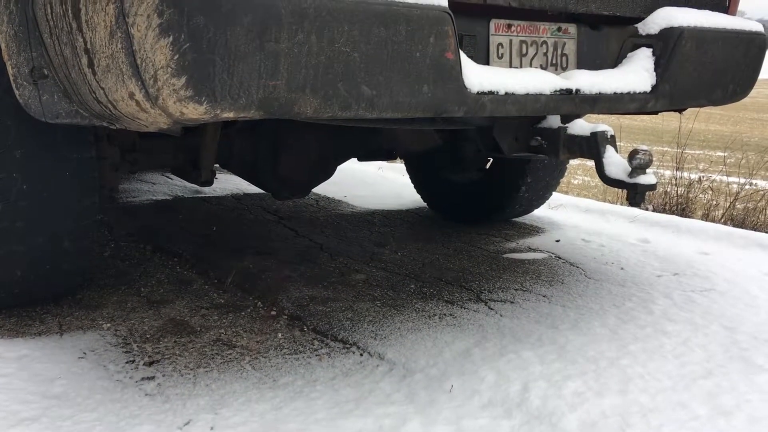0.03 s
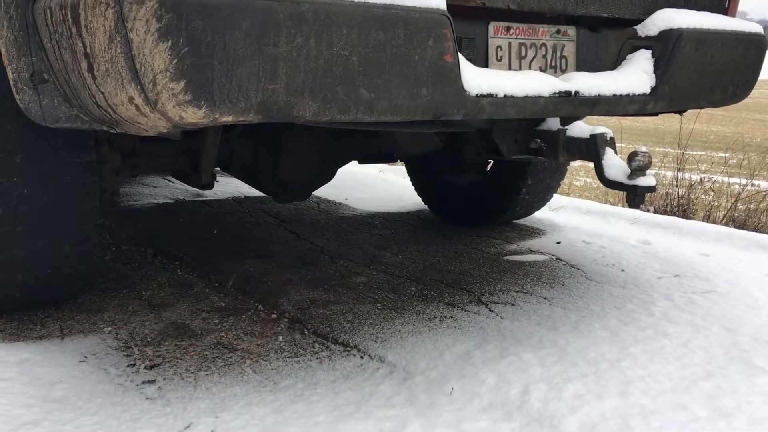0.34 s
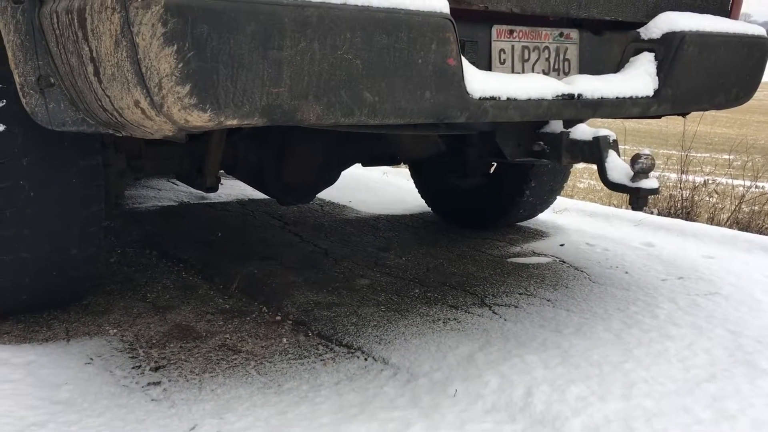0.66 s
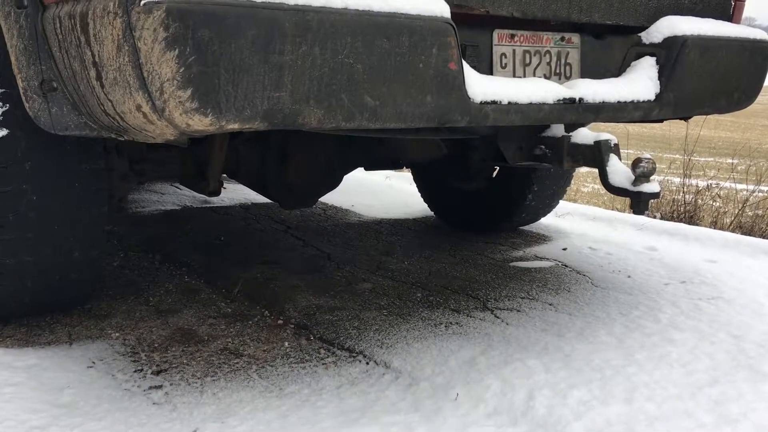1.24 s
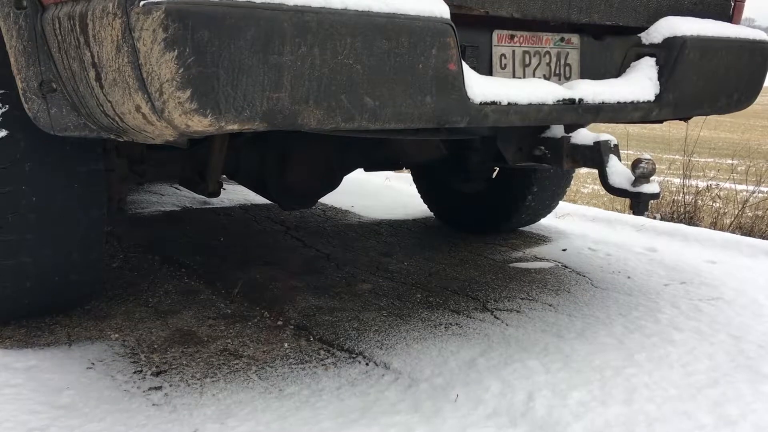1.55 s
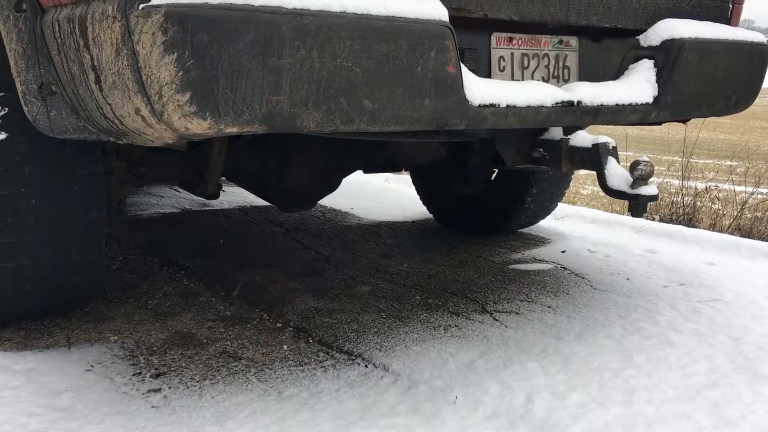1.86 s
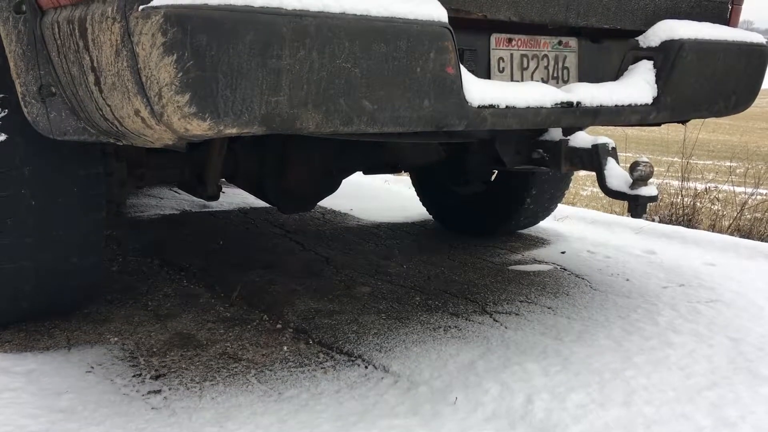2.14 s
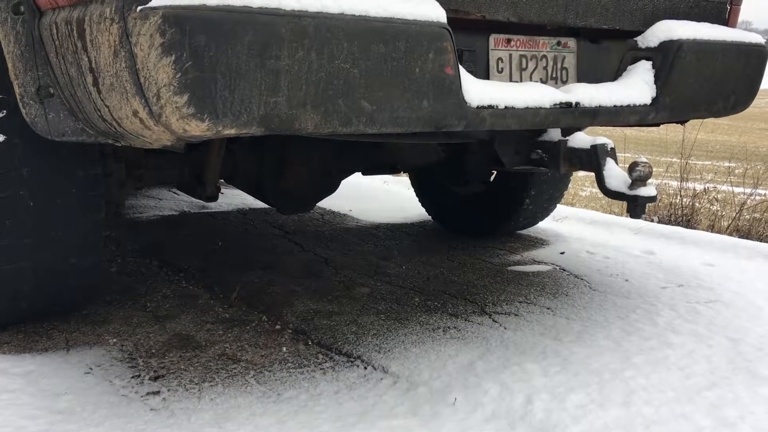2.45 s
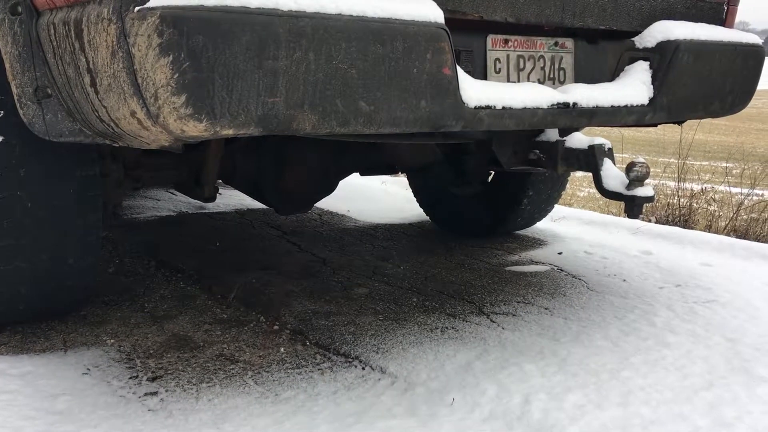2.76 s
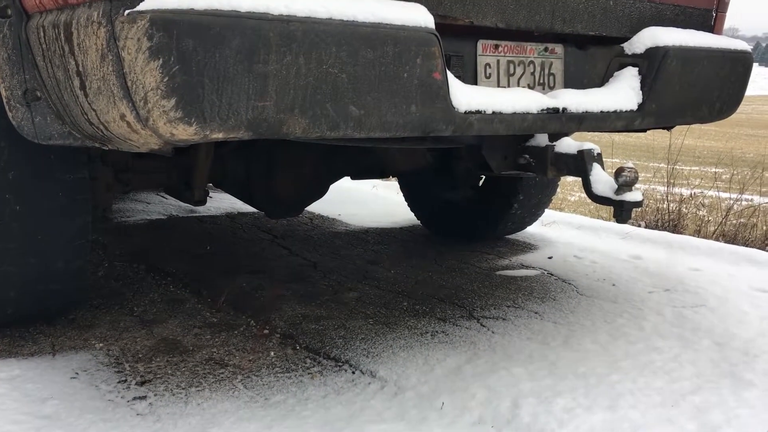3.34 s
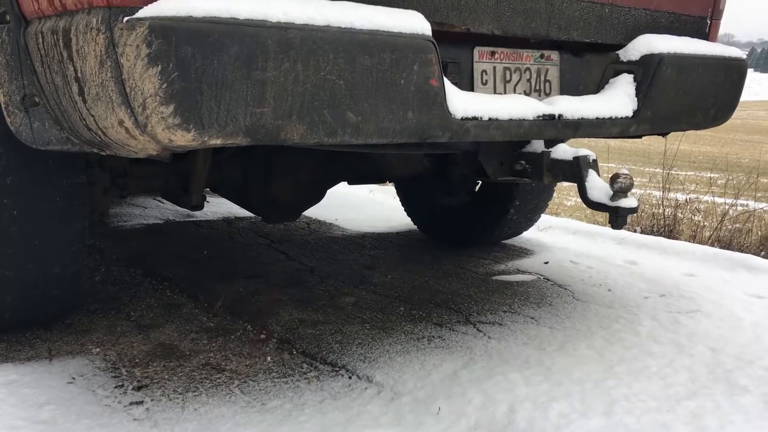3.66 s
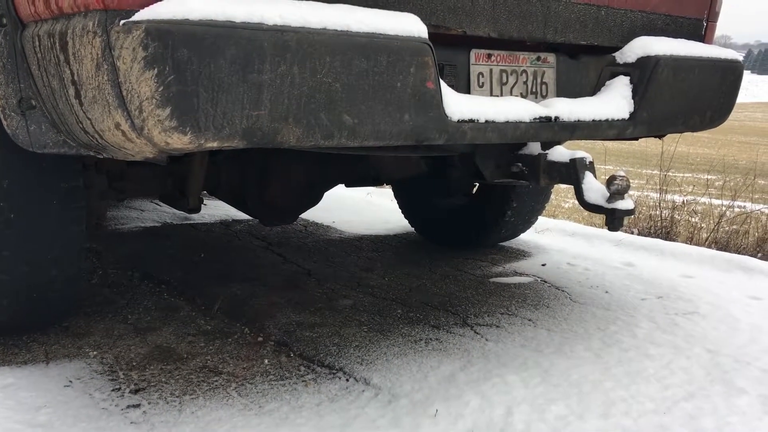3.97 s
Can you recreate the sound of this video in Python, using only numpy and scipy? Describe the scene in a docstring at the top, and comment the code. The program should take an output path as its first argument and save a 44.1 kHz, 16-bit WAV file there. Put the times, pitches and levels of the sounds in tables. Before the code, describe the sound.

A diesel pickup starts, heard outdoors beside the rear bumper. A faint fuel pump whirs with a thin electric whine. At about 0.9 seconds the starter clacks in and cranks in grinding pulses, each falling in pitch. Near 1.9 seconds the engine catches with loud, hard knocks and speeds up. From about 2.5 seconds it holds a fast idle, low exhaust throb under lighter clatter, until 4 seconds.

```python
"""A fuel pump whirs, heard outdoors beside the rear bumper of a cold diesel pickup.
The starter's pinion clacks in, and its gear whine falls in pitch as each compression stroke loads it.
The engine catches with hard combustion knocks that ring the block, runs up and settles to a fast idle:
pressure pulses from the tailpipe under a lighter clatter, scattered between ground and chassis."""
import sys
import numpy as np
from scipy import signal
from scipy.fft import rfft, irfft
from scipy.io import wavfile

SR = 44100
rng = np.random.default_rng(int(sys.argv[2]) if len(sys.argv) > 2 else 0)


def digitize_waveform(pressure):
    """Quantize a signal to 16-bit integers and store it at the path in sys.argv[1].

    Rows of a 2-D input are taken as channels; values are limited to [-1, 1].
    """
    field = np.atleast_2d(pressure).T
    bounded = np.clip(field, -1, 1)
    quanta = np.round(bounded * 32767).astype(np.int16)
    wavfile.write(sys.argv[1], SR, quanta)


N = 176400
T = np.arange(N) / SR

# Levels in the tables are relative; each source applies its own gain.
# first hard firings (time [s], knock level [dB], exhaust level [dB])
HARD_FIRINGS = [(1.865, -8.5, -4.5), (1.911, -4.5, -0.5), (1.949, -6.5, 2), (1.987, -10.5, -1),
                (2.021, -8, -1), (2.055, -8.5, -1), (2.087, -9.5, -2), (2.116, -8.5, -4.5),
                (2.145, -7.5, -4.5), (2.174, -6, -3.5), (2.201, -8, -2.5), (2.226, -6.5, -0.5),
                (2.25, -5, -3.5), (2.274, -7.5, -3), (2.296, -7.5, -5), (2.318, -10.5, -5.5),
                (2.339, -11.5, -13), (2.361, -6.5, -3), (2.383, -9.5, -4), (2.404, -6.5, -1),
                (2.424, -8.5, 0.5), (2.444, -10, -0.5), (2.464, -10, 0), (2.483, -10, 3), (2.502, -11.5, 2),
                (2.521, -13.5, 1.5), (2.54, -28, -1)]
# effort at idle (time [s], knock level [dB], exhaust level [dB])
IDLE_LEVELS = [(2.56, -25.5, -3.5), (2.65, -21, -4), (2.87, -21.5, -3), (3.12, -23, -4), (3.301, -22, -5),
               (3.431, -22.5, -7), (3.6, -20.5, -5), (3.82, -18, -4.5), (4.0, -20.5, -4)]
# idle speed (time [s], firing rate [Hz])
IDLE_SPEED = [(2.559, 52.7), (2.73, 52.65), (2.85, 52.1), (3.08, 52.4), (3.2, 51.95), (3.31, 51.3),
              (3.43, 50.05), (3.55, 49.75), (3.8, 49.7), (3.92, 50.6)]
# imbalance of the six cylinders (knock offset [dB])
CYLINDERS_DB = [.6, .2, -.3, 0, -.6, .1]
# knock spectrum during the run-up (frequency [Hz], level [dB])
HARD_KNOCK = [(180, -34), (300, 12), (667, -15.5), (814, 2), (1030, -29), (1360, -4.5), (1810, -27),
              (2000, -14), (2570, -29), (3130, -12.5), (4750, -17), (6740, -16.5), (9390, -20),
              (10400, -26), (16000, -32.5)]
# knock spectrum at idle (frequency [Hz], level [dB])
SOFT_KNOCK = [(180, -33), (300, -7), (425, -4), (494, -3), (667, -6), (828, 10), (900, -22), (1480, 6),
              (1900, -39), (2000, -22), (2170, -24), (3190, -4), (3640, -16), (7200, -14), (16000, -32)]
# resonances of the engine block (frequency [Hz], bandwidth [Hz], level [dB])
BLOCK_MODES = [(359, 40, -9), (520, 70, -7), (840, 36, -6), (1080, 110, -10), (1365, 50, -6),
               (1465, 70, -2.5), (1620, 70, -7), (2045, 34, -15), (2307, 25, -14), (2495, 60, -14),
               (3075, 60, -9), (3320, 50, -10), (3465, 35, -13), (4520, 60, -14)]
# strength of the block's ringing (time [s], level [dB])
RINGING = [(1.86, -2), (2.15, -1), (2.24, 2), (2.4, 4), (2.5, 4), (2.58, 0), (3.3, 0), (4.0, 1.5)]
# clatter scattered between ground and chassis (frequency [Hz], level [dB])
SCATTER = [(150, 0), (350, 1), (500, -2), (650, -8), (900, -4), (1550, -4), (1850, -13), (3200, -9),
           (6000, -16), (9500, -22), (10500, -30), (16000, -35)]
# tailpipe response under load (frequency [Hz], level [dB])
LOADED_PIPE = [(20, -41.5), (38, 4.5), (55, 9.5), (80, 7), (120, -12.5), (165, -9), (230, -3.5),
               (330, -12.5), (480, -23), (800, -51), (2000, -53)]
# tailpipe response at idle (frequency [Hz], level [dB])
IDLE_PIPE = [(20, -22), (38, -4), (52, 1.7), (104, .7), (156, -3.7), (208, -8), (260, -16.5), (315, -25),
             (420, -32), (520, -27), (660, -35), (840, -32), (1000, -42), (2000, -59.5)]
# tailpipe response while cranking (frequency [Hz], level [dB])
CRANKING_PIPE = [(20, -16), (45, 5.5), (62, 11.5), (85, -2), (130, -9), (250, -15), (500, -34), (2000, -62)]
# unfired puffs (time [s], level [dB])
PUFFS = [(0.99, -27), (1.126, -13), (1.298, -13), (1.435, -24), (1.58, -15), (1.695, -20), (1.813, -11)]
# gas rushing out with each loaded pulse (frequency [Hz], level [dB])
BLAST = [(60, -12), (105, 4), (160, -4), (240, 0), (330, -2), (450, -16), (650, -28), (1500, -46)]
# pinion striking the ring gear (frequency [Hz], level [dB])
CLACK = [(100, -3), (500, -6.5), (800, 1), (1700, 0.5), (2600, -9), (4300, -1.5), (7000, -11.5),
         (10000, -17.5), (16000, -28)]
# starter's first spin (time [s], mesh frequency [Hz], level [dB])
SPIN = [(0.93, 620, -47), (0.975, 830, -25), (1.02, 740, -25), (1.07, 840, -20), (1.1, 895, -16.5),
        (1.135, 895, -16.5), (1.182, 680, -25), (1.218, 567, -18.5), (1.25, 559.4, -27),
        (1.285, 599.6, -34)]
# compression strokes (time [s], duration [s], first mesh [Hz], last mesh [Hz], level [dB])
STROKES = [(1.294, .115, 1330, 630, -18.5), (1.443, .11, 1370, 600, -19.5), (1.578, .095, 1340, 600, -19.5),
           (1.699, .105, 1350, 610, -18.5)]
# gear mesh harmonics, from the fundamental up (level [dB])
MESH_HARMONICS_DB = [0.5, -3, -4, -8]
# starter housing response (frequency [Hz], level [dB])
HOUSING = [(300, -33), (620, -26), (740, -9), (890, 3.5), (1100, -3.5), (1350, 0.5), (1680, 4),
           (1950, -10.5), (2300, -7), (2600, -22.5), (5000, -22)]
# grinding of the gears (frequency [Hz], level [dB])
GRIND = [(200, -14.5), (580, -23), (750, 4.5), (1200, -5.5), (1650, 3.5), (2000, -6.5), (2350, -2),
         (2650, -19.5), (5000, -20), (15000, -36)]
# rattle of the turning engine (frequency [Hz], level [dB])
RATTLE = [(100, -2), (400, -2), (1500, -5), (3000, -1.5), (3700, -4), (4400, 2), (5000, -6), (5600, -1.5),
          (6500, -6.5), (9500, -14), (10500, -23), (16000, -27)]
# fuel pump whir (frequency [Hz], level [dB])
PUMP = [(25, -11), (40, -10), (62, -1), (110, -11), (240, -13), (480, -21), (700, -15), (940, -5),
        (1200, -8), (1540, -4), (1850, -9), (2150, -9), (2400, -16), (2900, -21), (3300, -22), (4200, -27),
        (5200, -38), (9000, -44), (15000, -54)]
# electric whines (start [s], end [s], frequency [Hz], level [dB], fade [dB/s])
WHINES = [(-0.02, 0.88, 544.5, -53.5, -4), (0.155, 0.8, 1013, -40.5, 12)]

ENGAGE_S, LAST_TAKE_UP_S, CATCH_S = 0.935, 1.848, HARD_FIRINGS[0][0]
UNLOAD_S, UNLOAD_SPAN_S = 2.38, .11  # middle and length of the change from load to idle
FIRING_JITTER_S, KNOCK_SPREAD_DB, EXHAUST_SPREAD_DB = .00014, .8, .1
BLOCK_DB, BLOCK_LEAD_S, SCATTER_DB = -15, .0011, -14.5
EXHAUST_DB, BLAST_DB, CRANK_AIR_DB = 41.5, -25, -38
MUFFLER_TURN_HZ, IDLE_PULSE_LEAD_S = 110, .003
MESH_WOBBLE, MESH_DB, GRIND_DB, CLACK_DB = .021, 1, -5.5, -23.5
RATTLE_DB, TAKE_UP_DB, LOADED_RATTLE_DB = -39, -35.5, -26
PUMP_DB, KNOCK_LOW_HZ, CUTOFF_HZ = -36, 1800, 16200


def firings():
    """Quasi-periodic combustion: times and levels of the run-up, then of six cylinders idling in turn."""
    s, knock_db, exhaust_db = np.transpose(IDLE_LEVELS)
    t = T[T >= IDLE_SPEED[0][0]]
    count = np.cumsum(np.interp(t, *np.transpose(IDLE_SPEED))) / SR
    k = np.arange(int(count[-1]) + 1)
    jitter, knock_chance, exhaust_chance = rng.standard_normal((400, 3))[k].T
    times = np.interp(k, count, t) + FIRING_JITTER_S * jitter
    knock = np.interp(times, s, knock_db) + np.resize(CYLINDERS_DB, len(k))
    knock += KNOCK_SPREAD_DB * knock_chance
    pulse = np.interp(times, s, exhaust_db) + EXHAUST_SPREAD_DB * exhaust_chance
    return np.vstack([HARD_FIRINGS, np.transpose([times, knock, pulse])]).T


def knocks(times, db):
    """Impulsive excitation: each combustion radiates a gritty burst, hard at first and softer at idle."""
    hard = np.arange(len(times)) < len(HARD_FIRINGS)
    run_up = bursts(times[hard], from_db(db[hard] - 7), attack=.004, hold=.003, decay=.0055)
    idle = bursts(times[~hard], from_db(db[~hard] - 4), attack=.0018, hold=.0045, decay=.0038)
    high_pass = signal.butter(1, KNOCK_LOW_HZ, "high", fs=SR, output="sos")
    out = np.zeros(N)
    for envelope, spectrum in ((run_up, HARD_KNOCK), (idle, SOFT_KNOCK)):
        grit = rng.standard_normal(N) * from_db(3 * drift(540))
        out += envelope * rms_one(signal.sosfilt(high_pass, colour(grit, spectrum)))
    return underbody(out)


def block_ringing(times, db):
    """Modal resonance: each blow excites the damped modes of the engine block."""
    blow_db = BLOCK_DB + np.interp(times, *np.transpose(RINGING)) + .56 * db
    blows = bursts(times - BLOCK_LEAD_S, from_db(blow_db), attack=.00056, hold=.001, decay=.0038)
    out = np.zeros(N)
    for hz, width, level_db in BLOCK_MODES:
        r = np.exp(-np.pi * width / SR)
        poles = [1, -2 * r * np.cos(2 * np.pi * hz / SR), r * r]
        mode = signal.lfilter([1, 0, -1], poles, blows * rng.standard_normal(N))
        out += from_db(level_db) * np.sqrt((1 - r * r) / 2) * mode
    return out


def exhaust(times, db):
    """Source and filter: the pipe shapes pressure pulses, soft cranking, hard loaded, round at idle."""
    puff_s, puff_db = np.transpose(PUFFS)
    cranking = colour(clicks(puff_s, from_db(puff_db)), CRANKING_PIPE)
    idling = np.clip((times - UNLOAD_S) / UNLOAD_SPAN_S + .5, 0, 1)
    loaded = colour(clicks(times, from_db(db) * (1 - idling)), LOADED_PIPE)
    idle = colour(clicks(times - IDLE_PULSE_LEAD_S, from_db(db) * idling), IDLE_PIPE)
    r = np.exp(-2 * np.pi * MUFFLER_TURN_HZ / SR)
    idle = signal.lfilter([-r, 1], [1, -r], idle)  # all-pass: the muffler delays the lows
    hard = slice(len(HARD_FIRINGS))
    outflow = bursts(times[hard], from_db(BLAST_DB + db[hard]), attack=.003, hold=.005, decay=.028)
    blast = outflow * noise(BLAST)
    pumped_air = from_db(CRANK_AIR_DB) * gate(ENGAGE_S, CATCH_S, ramp=.05) * noise(CRANKING_PIPE)
    return from_db(EXHAUST_DB) * (cranking + loaded + idle) + blast + pumped_air


def starter():
    """Mechanical loading: each compression slows the motor, so its whine swells and falls in pitch."""
    s, hz, db = np.transpose(SPIN)
    mesh_hz = np.interp(T, s, hz)
    load = from_db(np.interp(T, s, db)) * gate(s[0], s[-1])
    for start, length, first_hz, last_hz, level_db in STROKES:
        progress = np.clip((T - start) / length, 0, 1)
        glide_hz = first_hz * (last_hz / first_hz) ** (progress ** .92)
        mesh_hz = np.where(T >= start, glide_hz, mesh_hz)
        swell_db = np.interp(progress, [0, .42, 1], [-3, 0, -11])
        load += from_db(level_db + swell_db) * gate(start, start + length, ramp=.012)
    return gears(mesh_hz, load) + clack_and_rattle(load)


def gears(mesh_hz, load):
    """Periodic tooth contact: mesh harmonics, filtered by the housing, sound over grinding noise."""
    phase = 2 * np.pi * np.cumsum(mesh_hz * (1 + MESH_WOBBLE * drift(89))) / SR
    teeth = sum(from_db(db + 2.24 * drift(48)) * np.sin(order * phase)
                for order, db in enumerate(MESH_HARMONICS_DB, 1))
    whine = colour(underbody(teeth * load, share=.45, decay=.018, low_hz=300), HOUSING)
    grinding = from_db(GRIND_DB + 1.8 * drift(80)) * load * noise(GRIND)
    return from_db(MESH_DB) * whine + grinding


def clack_and_rattle(load):
    """Impact noise: the pinion hits the ring gear, and the engine rattles as the gears take up load."""
    take_ups = [row[0] for row in STROKES] + [LAST_TAKE_UP_S]
    shaking = from_db(RATTLE_DB) * gate(ENGAGE_S, CATCH_S) + from_db(LOADED_RATTLE_DB) * load
    shaking += bursts(take_ups, from_db(TAKE_UP_DB), attack=.014, hold=.012, decay=.035)
    clack = bursts([ENGAGE_S], from_db(CLACK_DB), attack=.0038, hold=.019, decay=.014) * noise(CLACK)
    flicker = from_db(1.7 * drift(130))
    return underbody(flicker * (shaking * noise(RATTLE) + clack))


def fuel_pump():
    """Broadband and tonal noise: a steady whir, with thin electric whines before the start."""
    out = from_db(PUMP_DB + .5 * drift(5.8)) * noise(PUMP)
    for start, end, hz, db, fade in WHINES:
        phase = 2 * np.pi * np.cumsum(hz * (1 + .001 * drift(10))) / SR
        out += np.sqrt(2) * from_db(db - fade * (T - start)) * gate(start, end) * np.sin(phase)
    return out


def scattered_clatter(times, db):
    """Diffuse scattering: each knock leaves a noisy tail between ground and chassis."""
    tails = bursts(times, from_db(SCATTER_DB + .62 * db), attack=.0033, hold=.004, decay=.027)
    return tails * noise(SCATTER)


def underbody(x, share=.25, decay=.007, low_hz=2400):
    """Multiple reflection: ground and chassis return a short cloud of echoes above low_hz."""
    t = T[:SR // 8]
    high_pass = signal.butter(2, low_hz, "high", fs=SR, output="sos")
    cloud = signal.sosfilt(high_pass, rng.standard_normal(len(t))) * np.exp(-t / decay)
    echoes = signal.oaconvolve(x, cloud / np.linalg.norm(cloud))[:N]
    return np.sqrt(1 - share) * x + np.sqrt(share) * echoes


def from_db(db):
    """Logarithmic level to amplitude ratio."""
    return 10 ** (np.asarray(db) / 20)


def rms_one(x):
    """Normalisation to unit power."""
    return x / np.sqrt(np.mean(x ** 2) + 1e-20)


def colour(x, spectrum):
    """Minimum-phase filtering: folding the cepstrum makes the given response causal."""
    size = 16384
    hz, db = np.transpose(spectrum)
    grid = np.maximum(np.arange(size // 2 + 1) * SR / size, 1)
    gain = from_db(np.interp(np.log(grid), np.log(hz), db)) * np.minimum(grid / hz[0], 1) ** 2
    cepstrum = irfft(np.log(gain), size)
    cepstrum[1:size // 2] *= 2
    cepstrum[size // 2 + 1:] = 0
    return signal.oaconvolve(x, irfft(np.exp(rfft(cepstrum)))[:size // 2])[:N]


def drift(rate_hz):
    """Random modulation: low-passed noise of rms 1."""
    step, run_in = 8, 2000
    r = np.exp(-2 * np.pi * rate_hz * step / SR)
    slow = signal.lfilter([1], [1, -2 * r, r * r], rng.standard_normal(N // step + run_in + 2))[run_in:]
    return np.interp(np.arange(N) / step, np.arange(len(slow)), rms_one(slow))


def noise(spectrum):
    """Spectral shaping: coloured noise of rms 1."""
    return rms_one(colour(rng.standard_normal(N), spectrum))


def clicks(times, gains):
    """Impulse train: one click at each time."""
    out = np.zeros(N)
    np.add.at(out, np.clip(np.round(np.asarray(times) * SR).astype(int), 0, N - 1), gains)
    return out


def bursts(times, gains, attack, hold, decay):
    """Incoherent addition: envelopes that rise, hold and decay (in seconds) sum in power."""
    t = T[:SR // 4]
    shape = np.minimum(t / attack, 1) * np.exp(-np.maximum(t - attack - hold, 0) / decay)
    power = np.zeros(N + SR)
    for start, gain in zip(times, np.broadcast_to(gains, len(times))):
        i = int(start * SR)
        power[i:i + len(t)] += (gain * shape) ** 2
    return np.sqrt(power[:N])


def gate(start, end, ramp=.01):
    """Time window with linear ramps."""
    return np.clip((T - start) / ramp, 0, 1) * np.clip((end - T) / ramp + 1, 0, 1)


def scene():
    """Superposition: pump, starter and engine add in mono."""
    times, knock_db, exhaust_db = firings()
    mix = fuel_pump() + starter() + exhaust(times, exhaust_db)
    mix += knocks(times, knock_db) + block_ringing(times, knock_db) + scattered_clatter(times, knock_db)
    return mix[None]


def record(dry):
    """Soft saturation rounds the highest peaks, and a low-pass filter cuts the top."""
    rounded = dry / (1 + dry ** 8) ** (1 / 8)
    return signal.sosfilt(signal.ellip(10, .1, 80, CUTOFF_HZ, fs=SR, output="sos"), rounded)


dry = scene()
out = record(dry)
digitize_waveform(out)
```